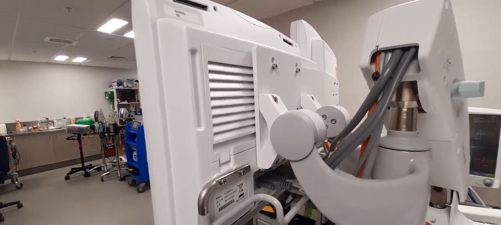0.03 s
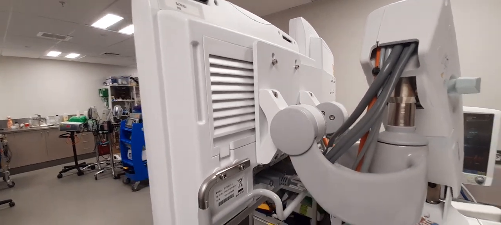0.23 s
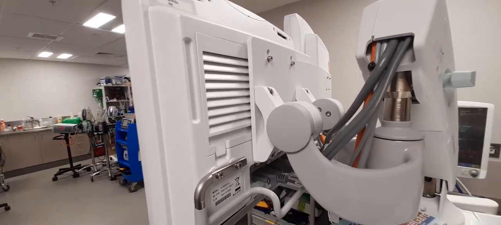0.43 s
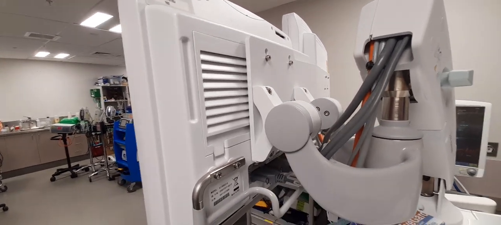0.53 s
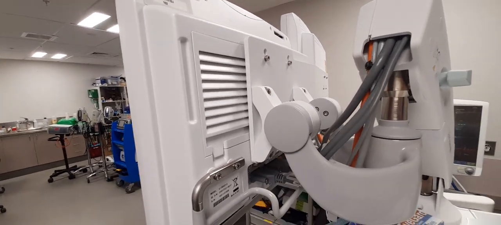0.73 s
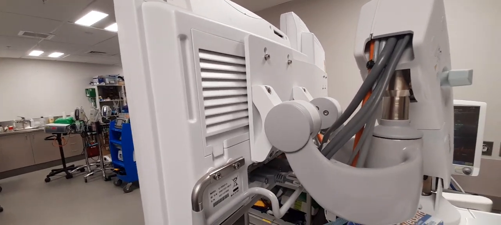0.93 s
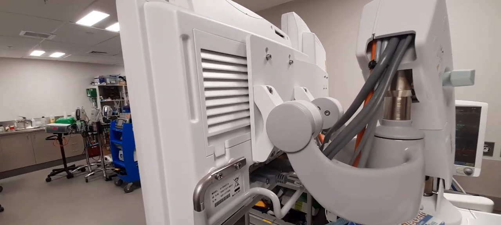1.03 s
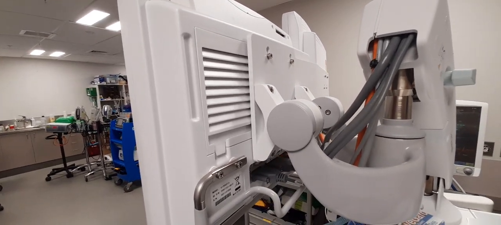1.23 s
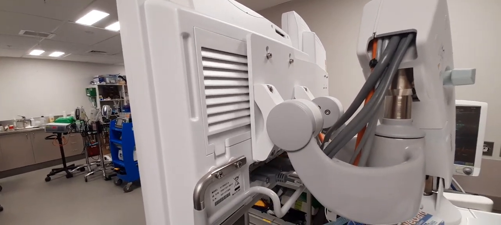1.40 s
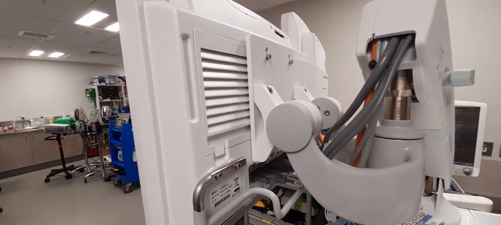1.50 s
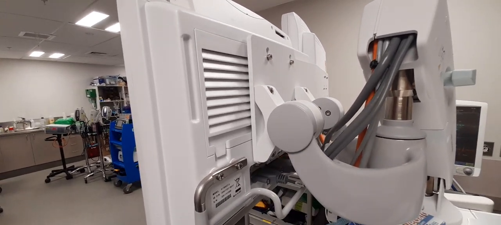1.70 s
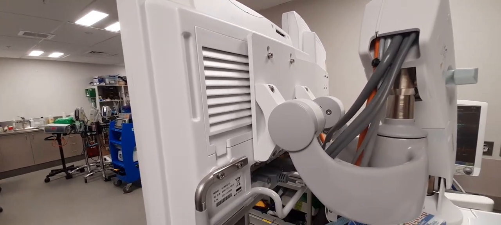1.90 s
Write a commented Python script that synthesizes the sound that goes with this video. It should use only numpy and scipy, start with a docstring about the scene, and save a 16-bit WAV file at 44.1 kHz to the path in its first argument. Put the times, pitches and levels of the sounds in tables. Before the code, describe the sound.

Ventilation rumbles and motors hum in an equipment room. Then a small fan in a medical machine, near the microphone, buzzes and rattles in irregular bursts with a thin, pinging edge and short echoes, weakening at the end.

```python
"""Ventilation rumble, motor hum and faint whines fill an equipment room, heard on a stereo pair.
Then, close by, a small cooling fan rattles behind the louvres of a medical machine. Its rotor grazes
the frame once a turn, about 37 times a second, in uneven spells. Every graze pings and shakes the frame
and the cover: middling ones sound thinnest, the hardest knock loudest. The cabinet and the walls answer
with short echoes."""
import sys
import numpy as np
from scipy import signal
from scipy.fft import rfft, irfft
from scipy.io import wavfile
from scipy.ndimage import uniform_filter1d

SR = 44100
rng = np.random.default_rng(int(sys.argv[2]) if len(sys.argv) > 2 else 0)


def pcm_store(signal):
    """Save signal as 16-bit PCM."""
    levels = np.round(np.clip(np.atleast_2d(signal), -1, 1) * 32767)
    wavfile.write(sys.argv[1], SR, levels.astype(np.int16).T)


N = 85995
T = np.arange(N) / SR
HZ = np.maximum(np.arange(N // 2 + 1) * SR / N, 1)


def from_db(db):
    """Decibels to gain."""
    return 10 ** (np.asarray(db) / 20)


def rms_one(x):
    """Scale to an rms of 1."""
    return x / np.sqrt(np.mean(x ** 2) + 1e-20)


def over_hz(points):
    """Read a table on a log-frequency axis."""
    hz, value = np.transpose(points)
    return np.interp(np.log(HZ), np.log(hz), value)


def resonance(x, hz, width_hz):
    """Two-pole resonance with a gain of 1 at its peak."""
    radius = np.exp(-np.pi * width_hz / SR)
    feedback = [1, -2 * radius * np.cos(2 * np.pi * hz / SR), radius ** 2]
    return signal.lfilter(np.array([1, 0, -1]) * (1 - radius ** 2) / 2, feedback, x + 1e-18)


def burst(envelope):
    """Noise under an envelope, evened out until it has no colour of its own; energy 1."""
    x = rng.standard_normal(len(envelope))
    for _ in range(12):
        spectrum = rfft(x * envelope)
        x = irfft(spectrum / (np.abs(spectrum) + 1e-12), len(envelope))
        x = x / np.sqrt(np.abs(uniform_filter1d(x * x, size=15)) + 1e-18)
    return rms_one(x * envelope) / np.sqrt(len(x))


def clicks(times, db):
    """One click at each time."""
    out = np.zeros(N)
    out[(times * SR).astype(int)] = from_db(db)
    return out


def convolve(x, response):
    """Pass each channel through its response."""
    return signal.fftconvolve(x, response, axes=1)[:, :N]


def ventilation(level_db=-42.5, rumble_below_hz=188):
    """Air moving through the room: a swelling rumble, alike at both microphones, under a wide hiss."""
    # spectrum of the moving air: (frequency [Hz], relative level [dB])
    air_colour = [(25, -34), (50, -13), (80, -3), (130, 0.5), (155, -4), (180, -14.5), (270, -5),
                  (350, -10.5), (500, -18.5), (660, -21.5), (900, -24), (1250, -24), (2000, -33),
                  (2700, -36), (3100, -35.5), (3430, -30), (4000, -41.5), (6000, -43), (7400, -46.5),
                  (8400, -51.5), (9800, -49.5), (12000, -42.5), (15700, -49), (16000, -63)]
    # how alike the two microphones hear it: (frequency [Hz], correlation [-1 to 1])
    air_likeness = [(60, 0.95), (130, 0.95), (290, 0.9), (640, 0.74), (1410, -0.18), (3100, 0.12),
                    (15000, 0.15)]
    # where it sits in the stereo image: (frequency [Hz], left minus right [dB])
    air_balance = [(60, -1.5), (290, -3), (640, 1), (1410, -2), (3100, -6.5), (6820, -11), (9000, -3.5),
                   (15000, -7)]
    # the rumble swells and sinks: (time [s], relative level [dB])
    rumble_levels = [(0.0, -43), (0.152, -42.5), (0.26, -37.5), (0.374, -41), (0.754, -41), (0.82, -34),
                     (0.84, -39.5), (1.124, -41.5), (1.156, -34), (1.298, -44), (1.422, -37.5),
                     (1.65, -42.5), (1.694, -38), (1.95, -46)]
    mid, side = rfft(rng.standard_normal((2, N)))
    alike = over_hz(air_likeness)
    sides = np.array([[1], [-1]])
    noise = np.sqrt(1 + alike) * mid + sides * np.sqrt(1 - alike) * side
    colour = from_db(over_hz(air_colour) + sides * over_hz(air_balance) / 2)
    air = rms_one(irfft(noise * colour, N))
    rumble = irfft(rfft(air) / (1 + (HZ / rumble_below_hz) ** 8), N)
    swell_db = np.interp(T, *np.transpose(rumble_levels))
    swell = from_db(swell_db - swell_db.mean())
    return from_db(level_db) * (air + rumble * (swell - 1))


def hum():
    """Motors in the background: narrow bands of noise, heard as slightly wavering tones."""
    # motor hum and whines: (frequency [Hz], width [Hz], left level [dB], right level [dB])
    motor_tones = [(126.7, 8.4, -61, -56.5), (149.4, 15, -61, -56), (296.6, 21, -66, -59),
                   (631, 4, -67, -63), (659, 8.8, -66, -69), (1027, 1.5, -69.5, -63), (1290, 4.8, -75, -76),
                   (4510, 40, -78, -87), (10430, 91, -96, -79)]
    out = np.zeros((2, N))
    for hz, width_hz, left_db, right_db in motor_tones:
        band = 1 / (1 + ((HZ - hz) / width_hz * 2) ** 2)
        tone = irfft(rfft(rng.standard_normal(N)) * band, N)
        out += from_db([[left_db], [right_db]]) * rms_one(tone)
    return out


def contact(push_times, push_db, scrape_s, right_lag_s=.00016):
    """One short scrape for each push, the same on every turn; it reaches the right microphone later."""
    pushes = [from_db(db) * np.exp(-((T[:512] - at) / scrape_s) ** 2)
              for at, db in zip(push_times, push_db)]
    scrape = burst(sum(pushes))
    return np.array([scrape, np.roll(scrape, round(right_lag_s * SR))])


def ringing(modes, times, db, boost_db=24, spread_db=2.02):
    """Every graze sets the modes of one part ringing, each a little differently."""
    out = np.zeros((2, N))
    for k, (hz, width_hz, left_db, right_db) in enumerate(modes):
        blows = clicks(times, db + boost_db + spread_db * rng.standard_normal(len(db)))
        out += (-1) ** k * from_db([[left_db], [right_db]]) * resonance(blows, hz, width_hz)
    return out


def rasp(times, db, boost_db=25, rise_s=.0021, decay_s=.0026, friction_db=-4):
    """Many close modes, too dense to tell apart: a repeating pattern plus fresh friction noise."""
    # spectrum of a graze's rasp: (frequency [Hz], left gain [dB], right gain [dB])
    rasp_colour = [(298, -5, 1), (600, -21, -4.5), (1470, -8, -17.5), (2460, -8.5, -8), (3070, -1.5, -2),
                   (4470, -1, 3.5), (6470, 1.5, 6.5), (9000, 3.5, -3), (9400, -9, 2), (10200, -1, 7.5),
                   (11000, 1, 6), (12500, -1, 10), (14600, 6, 8), (15500, -2, 8), (16000, -21, -21)]
    t = T[:SR // 30]
    envelope = (1 - np.exp(-(t / rise_s) ** 2)) * np.exp(-t / decay_s)
    envelope /= np.linalg.norm(envelope)
    blows = np.tile(clicks(times, db + boost_db), (2, 1))
    pattern = convolve(blows, np.array([burst(envelope), burst(envelope)]))
    friction = convolve(blows, envelope[None]) * rng.standard_normal((2, N))
    hz, *sides = np.transpose(rasp_colour)
    colour = from_db([over_hz(np.column_stack([hz, side])) for side in sides])
    return irfft(rfft(pattern + from_db(friction_db) * friction) * colour, N)


def fan_rattle():
    """The fan's direct sound: rotor, frame, cover and housing ring as the rotor grazes the frame."""
    # one graze a turn while the rotor touches:
    # (time [s], relative ping level [dB], frame re ping [dB], cover re ping [dB])
    grazes = [(0.413, -40, -6, -12), (0.4403, -57, -6, -7), (0.4675, -32, -7, -20), (0.4948, -27, -7, -21),
              (0.522, -27, -7, -21), (0.5492, -24, -8, -19), (0.5764, -27, -7, -20), (0.6035, -35, -5, -12),
              (0.7123, -35, -4, -13), (0.7393, -23, -6, -17), (0.7664, -24, -1, -10), (0.7936, -22, -1, -6),
              (0.8209, -23, -3, -15), (0.8481, -23, -2, -6), (0.8754, -23, -2, -6), (0.9027, -25, -7, -17),
              (0.9573, -26, -7, -20), (0.9845, -24, -2, -11), (1.0118, -24, 1, -8), (1.0391, -22, -1, -8),
              (1.0664, -23, -1, -7), (1.0937, -23, -1, -8), (1.1211, -24, -2, -8), (1.1485, -24, -3, -9),
              (1.1759, -25, -8, -16), (1.2034, -31, -5, -17), (1.2306, -23, -5, -15),
              (1.2579, -24, -1, -10), (1.2853, -24, 0, -8), (1.3127, -24, -6, -14), (1.3401, -24, -6, -17),
              (1.3674, -23, -6, -17), (1.395, -25, -7, -19), (1.4224, -34, -4, -15), (1.4497, -26, -7, -22),
              (1.4771, -27, -6, -20), (1.5045, -24, -6, -19), (1.5318, -35, -4, -12),
              (1.6411, -48, -7, -12), (1.6684, -39, -7, -11), (1.6956, -54, -7, -10),
              (1.7229, -38, -5, -10), (1.7502, -38, -6, -11)]
    # the rebounding rotor pushes frame and cover again: (time into graze [s], frame [dB], cover [dB])
    rebounds = [(.0017, 0, -1), (.0031, 0, -1), (.0045, -4, -4), (.0060, -10, 0), (.0085, -20, -9)]
    # modes of each part: (frequency [Hz], width [Hz], left gain [dB], right gain [dB])
    rotor_modes = [(10070, 550, -16, -6.5), (10370, 670, -9, -8), (11850, 190, -8, -9), (12450, 75, 5, 14),
                   (12860, 260, 3, 12.5), (13370, 310, 12.5, 14), (13940, 140, 6, 14.5),
                   (14400, 400, -5, 7), (15000, 220, -4, 1)]
    frame_modes = [(6080, 184, 1, 10.2), (6590, 157, -9, 12.4), (7246, 204, 5.5, 16.16),
                   (7730, 370, -8, 13.3), (8104, 250, 11, 12.5)]
    cover_modes = [(1851, 93, 2.1, 5.5), (2117, 140, 1.6, 1.6), (2409, 21, 8.8, 2.4),
                   (4044, 150, 14.1, 14.8), (4192, 133, 8.5, 17.3), (5040, 92, 11, 15.4),
                   (5430, 100, 3.7, 12.2)]
    housing_modes = [(617, 51, 2.5, 2), (674, 53, 4, 4.5), (961, 42, -1.5, 0.5), (1323, 129, -5, -5),
                     (1719, 19.4, 2.5, 1), (1909, 86, -2.5, -1)]  # hollow, shaken through the frame
    times, ping_db, frame_re_ping, cover_re_ping = np.transpose(grazes)
    frame_db, cover_db = ping_db + frame_re_ping, ping_db + cover_re_ping
    push_times, on_frame, on_cover = np.transpose(rebounds)
    panel_ring = ringing(cover_modes, times, cover_db) + ringing(housing_modes, times, frame_db)
    rotor_ring = ringing(rotor_modes, times, ping_db)
    rotor = convolve(rotor_ring, contact([.0012], [0], scrape_s=.00042))  # struck once a graze
    frame_ring = ringing(frame_modes, times, frame_db)
    frame = convolve(frame_ring, contact(push_times, on_frame, scrape_s=.0005))
    panels = convolve(panel_ring, contact(push_times, on_cover, scrape_s=.0006))
    return rotor + frame + panels + rasp(times, cover_db)


def echoes(sound, t60_s, delay_s, size=16384):
    """Walls return a dying cloud of reflections, different at each microphone."""
    # the walls keep more of the midrange than of the treble: (frequency [Hz], gain [dB])
    wall_colour = [(600, 10), (2000, 11.5), (4000, 1), (7000, -0.5), (10000, 0), (13000, -1)]
    t = T[:size]
    envelope = np.clip(t / delay_s - .5, 0, 1) * from_db(-60 * t / t60_s)
    cloud = np.array([burst(envelope), burst(envelope)])
    response = irfft(rfft(cloud, N) * from_db(over_hz(wall_colour)), N)[:, :size]
    return convolve(sound, response)


def scene():
    """The fan close by in its cabinet, with the room's echo, ventilation and hum behind it."""
    fan = fan_rattle()
    near = fan + from_db(-12) * echoes(fan, t60_s=.045, delay_s=.004)  # inside the cabinet
    room = from_db(-18) * echoes(near, t60_s=.26, delay_s=.008)
    return ventilation() + hum() + near + room


def record(dry):
    """The microphone feed passes a steep low-pass, 60 dB down at 17.1 kHz."""
    return signal.sosfilt(signal.cheby2(16, 60, 17100, fs=SR, output="sos"), dry)


dry = scene()
out = record(dry)
pcm_store(out)
```